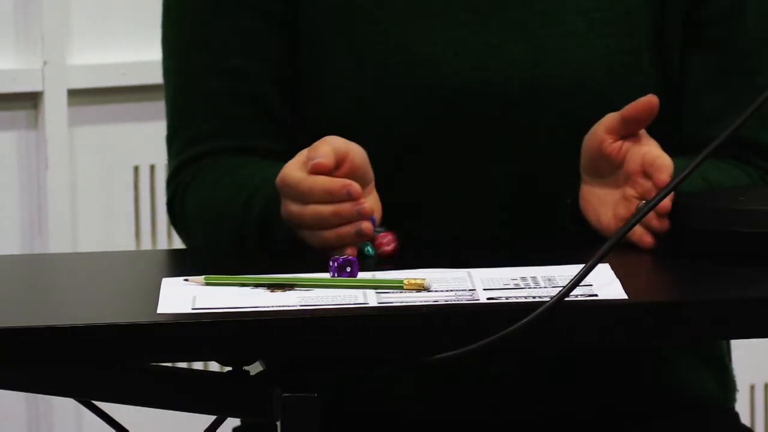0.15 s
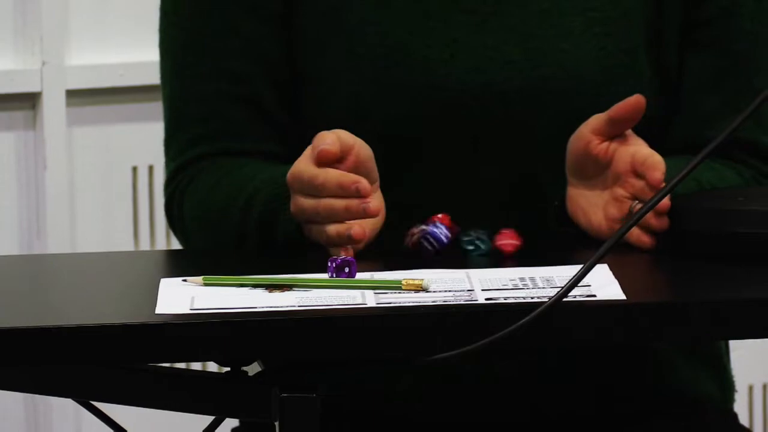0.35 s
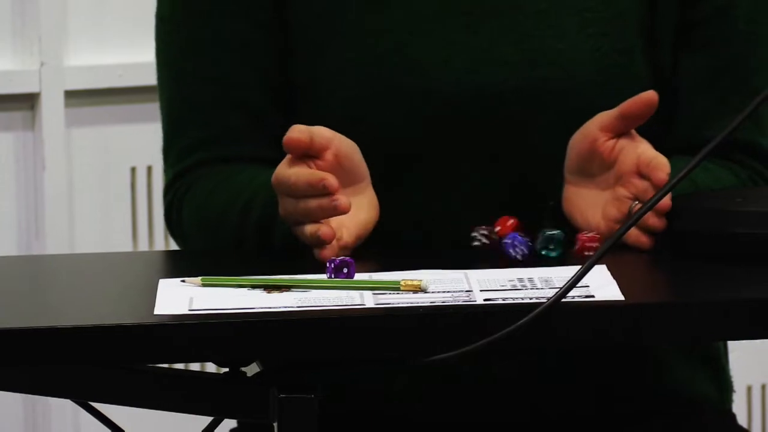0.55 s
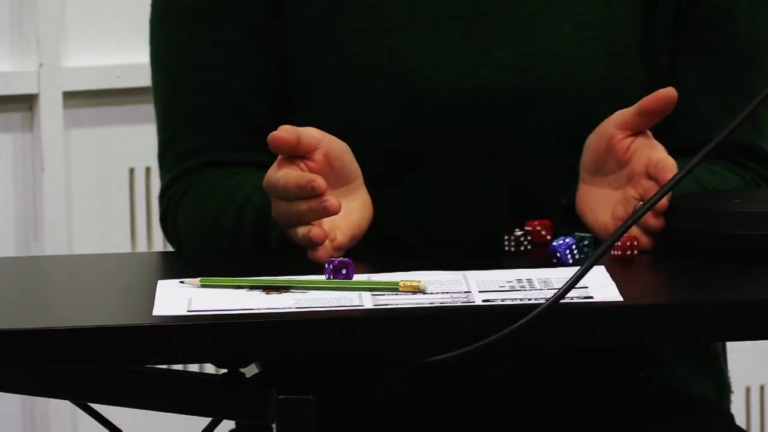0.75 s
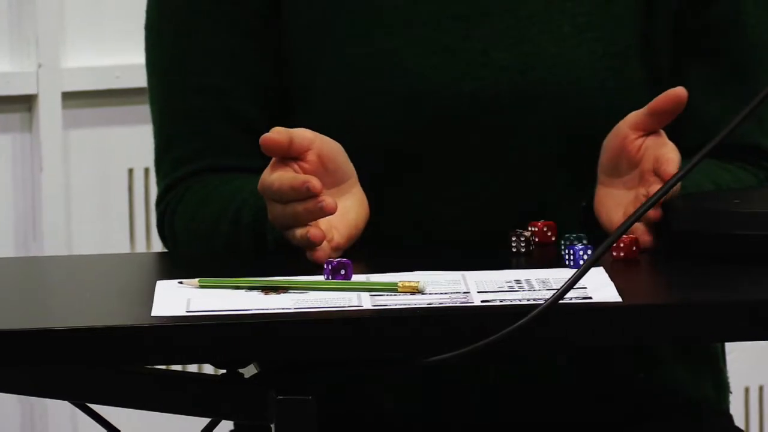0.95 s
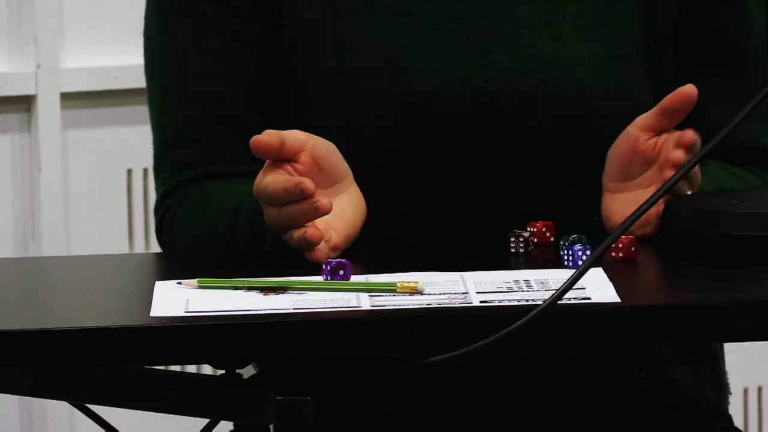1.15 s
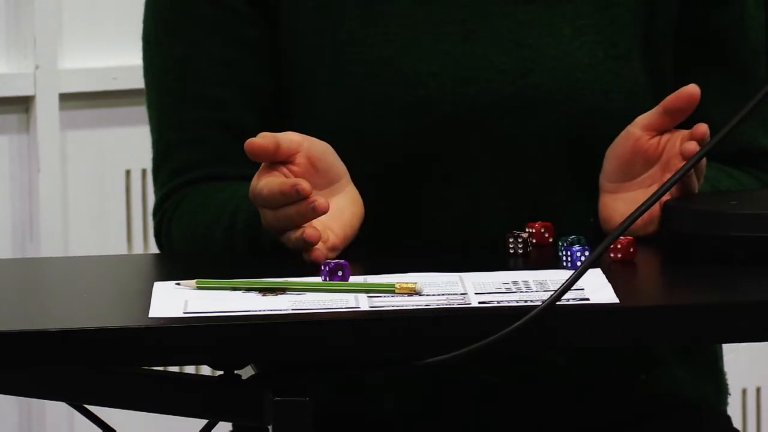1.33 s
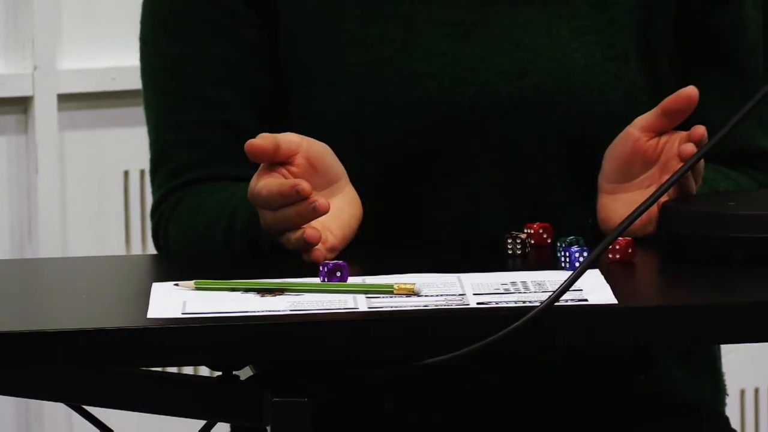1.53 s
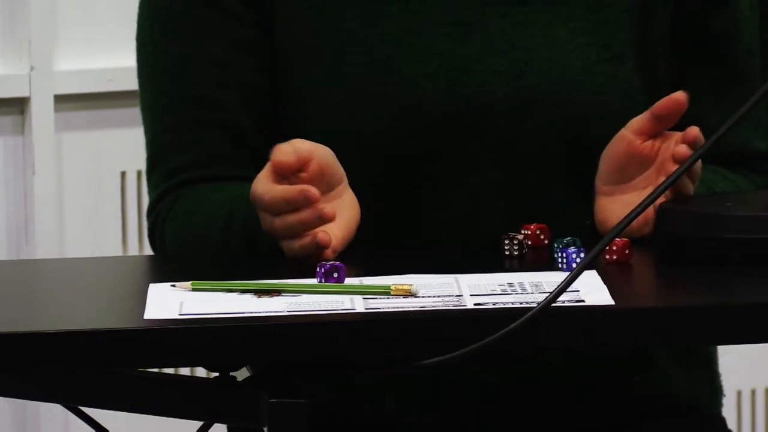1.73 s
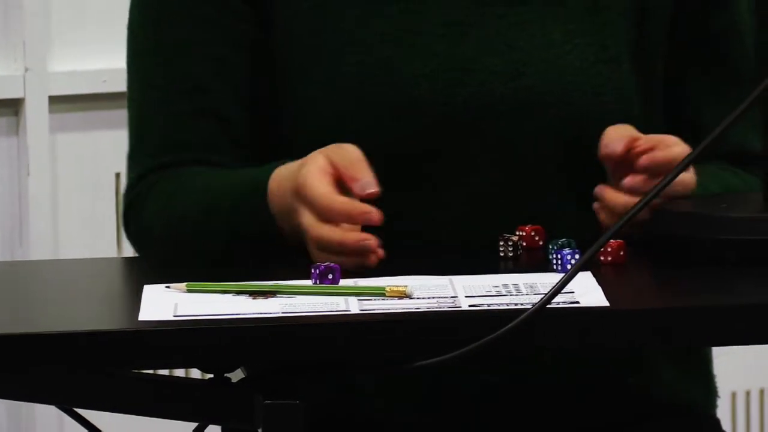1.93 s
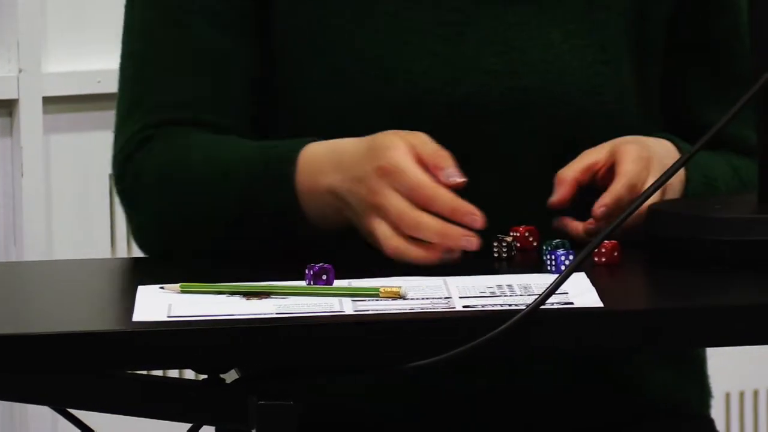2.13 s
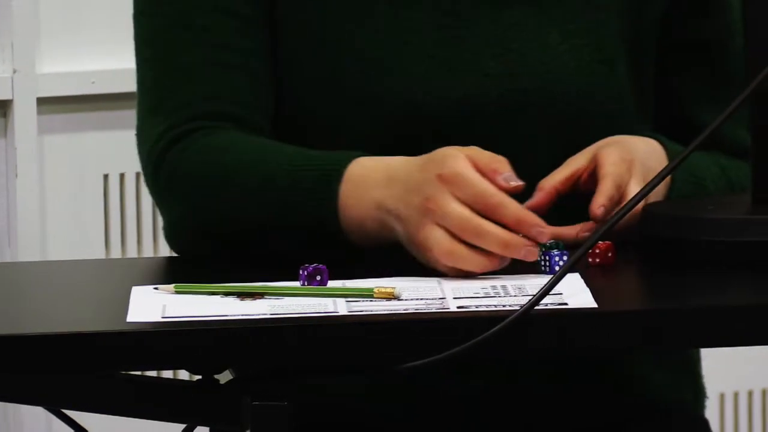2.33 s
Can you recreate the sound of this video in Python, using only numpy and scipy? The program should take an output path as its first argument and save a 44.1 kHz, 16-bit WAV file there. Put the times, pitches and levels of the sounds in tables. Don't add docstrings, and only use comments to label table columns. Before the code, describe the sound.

Dice clatter on a hollow-sounding tabletop, loud at first, then lighter rolling ticks and tiny rattles until still; later a dull wrist bump and barely audible sleeve rustle, in a quiet, slightly echoing room with faint hum.

```python
import sys
import numpy as np
from scipy import signal
from scipy.fft import rfft, irfft
from scipy.io import wavfile
from scipy.ndimage import uniform_filter1d

SR = 44100
rng = np.random.default_rng(int(sys.argv[2]) if len(sys.argv) > 2 else 0)


def dump(signal):
    limited = np.clip(np.atleast_2d(signal).T, -1, 1)
    pcm = np.round(limited * 32767).astype(np.int16)
    wavfile.write(sys.argv[1], SR, pcm)


def boost_factor(decibels):
    exponent = np.asarray(decibels, float) / 20
    return 10 ** exponent


N = 104913


def read_curve(points, hz):
    f, value = np.transpose(points)
    return np.interp(np.log(hz + 1), np.log(f + 1), value)


def evened(x):
    return x / np.sqrt(np.mean(x ** 2) + 1e-20)


def add(mix, s, sound):
    part = mix[round(s * SR):][:len(sound)]
    part += sound[:len(part)]


def resonate(x, hz, width):
    turn = np.exp(2j * np.pi * np.cumsum(hz * np.ones(len(x))) / SR)
    r = np.exp(-np.pi * width / SR)
    smooth = signal.lfilter([1 - r], [1, -r], x / turn + 1e-18)
    return 2 * (turn * smooth).real


def resonate_twice(x, hz, width):
    return evened(resonate(resonate(x, hz, width), hz, width))


def coloured(x, points):
    hz = np.fft.rfftfreq(len(x), 1 / SR)
    return irfft(rfft(x) * boost_factor(read_curve(points, hz)), len(x))


def highpass(x, hz):
    return signal.sosfilt(signal.butter(2, hz, "high", fs=SR, output="sos"), x)


# (frequency [Hz], level [dB per Hz])
HISS = [(20, 0.5), (55, -16), (100, 0), (150, -12), (300, -13.5), (700, -20.5), (2000, -21.5), (16000, -24)]
# (frequency [Hz], level [dB rms], steadiness [ratio])
FAN_HUM = [(94, -68, 0), (144, -67, 0), (739, -79, 2), (1035, -79, 2), (1338, -85, 1)]


def room_tone():
    t = np.arange(N) / SR
    tone = boost_factor(-59) * evened(coloured(rng.standard_normal(N), HISS))
    for hz, db, steadiness in FAN_HUM:
        wavering = evened(resonate(rng.standard_normal(N), hz, 4))
        steady = 2 * steadiness * np.sin(2 * np.pi * hz * t)
        tone += boost_factor(db) * evened(wavering + steady)
    return tone


def push(contact_s):
    shape = np.hanning(int(contact_s * SR) + 3)
    return shape / shape.sum()


# (time [s], level [dB], contact [s])
HAND_BUMPS = [
    (.057, -44, 0.0018),
    (1.748, -40.5, 0.0055),
    (1.788, -49, 0.0027),
    (1.9038, -27, 0.0057),
    (1.907, -40, 0.0023),
    (1.935, -47.5, 0.0033),
]
# (frequency [Hz], level [dB], time to fall 60 dB [s])
TABLE_MODES = [(106.6, -9.5, .16), (109.5, -7.5, 0.19), (143, -12.5, .06), (222.1, -4, 0.23),
               (328, -18.5, .13), (444.6, -13, 0.11), (560, -13, 0.11), (1160, -16.5, .06),
               (1560, -17.5, .05)]
MODE_SIGNS = [-1, -1, -1, 1, -1, 1, -1, 1, -1]
# (time [s], level [dB re tick])
DICE_WEIGHT = [(.081, 2.5), (.095, -7.5), (.13, 0.5), (.165, -6.5), (.186, 2.5), (.2, 0), (.25, -4.5),
               (.3, -3), (.35, -7.5), (.39, 0), (.45, -7.5), (.52, -1), (.6, -3), (.7, -2), (.85, -4),
               (1.1, -2)]


def table_top():
    delay_s, contact_s = .002, .0006
    wood_share, spot_spread = .2, .3
    t = np.arange(SR // 2) / SR
    out = np.zeros(N)
    for (hz, mode_db, t60), sign in zip(TABLE_MODES, MODE_SIGNS):
        force = np.zeros(N)
        for s, db, _, _, wood_db in STRIKES:
            weight_db = np.interp(s, *np.transpose(DICE_WEIGHT))
            blow = boost_factor(db + wood_share * wood_db + weight_db)
            spot = 1 + spot_spread * np.log(hz / 90) * rng.standard_normal()
            add(force, s + delay_s, blow * spot * push(contact_s))
        for s, db, bump_s in HAND_BUMPS:
            add(force, s, boost_factor(db) * push(bump_s))
        ring = sign * boost_factor(mode_db - 60 * t / t60) * np.sin(2 * np.pi * hz * t)
        out += signal.oaconvolve(force, ring)[:N]
    return highpass(out, 78)


# (frequency [Hz], time to fall 60 dB [s])
ROOM_DECAY = [(200, 0.78), (1000, 0.64), (2000, 0.27), (4000, 0.35), (7000, 0.28), (12000, 0.84)]


def room(x):
    start_s, tilt_db = 0.0067, -5
    taps = np.zeros(SR)
    at = np.arange(0, SR - 20, 20) + rng.integers(0, 20, (SR - 1) // 20)
    taps[at] = rng.choice([-1., 1.], at.shape)
    taps[:round(start_s * SR)] = 0
    hz, t, z = signal.stft(taps, SR, nperseg=128)
    decay_db = -60 * t / read_curve(ROOM_DECAY, hz)[:, None]
    treble_db = tilt_db * np.log2(np.maximum(hz, 2000) / 2000)[:, None]
    tail = signal.istft(z * boost_factor(decay_db + treble_db), SR, nperseg=128)[1]
    return signal.fftconvolve(x, tail / np.linalg.norm(tail))[:N]


ROCK_HASTE = 1.5


def tick(db, bright_db, top_db, wood_db, haste):
    paths_per_s = 11000
    bright_s, dull_s, sink_s, knock_s = 0.0037, 0.0057, 0.0043, 0.0027
    t = np.arange(700) / SR * haste
    noise = rng.standard_normal(700)
    paths = np.tanh(noise) * (rng.random(700) < paths_per_s / SR) + (t == 0)
    early = paths * np.exp(-(t / bright_s) ** 2)
    late = paths * np.exp(-(t / dull_s) ** 2)

    bright_hz = 5546 * (1 + .05 * np.tanh(noise[-1]))
    bright = resonate_twice(early, bright_hz, 2260)
    edge = evened(np.diff(early, prepend=0))
    top = resonate_twice(early, 7474, 2900) + boost_factor(-9) * edge
    dull_hz = 2850 + (3800 - 2850) * np.exp(-t / sink_s)
    dull = resonate_twice(late, dull_hz, 1900)
    knock = resonate_twice(paths * t * np.exp(-t / knock_s), 1772, 2460)

    rings = boost_factor(bright_db + 0.5) * bright + boost_factor(top_db + 6) * top
    return boost_factor(db - 9.5) * (rings + dull + boost_factor(wood_db + 1) * knock)


# (time [s], level [dB])
RATTLE_LEVEL = [
    (.08, -38),
    (.3, -38),
    (.6, -38),
    (.8, -40),
    (0.9, -44),
    (1.02, -46),
    (1.06, -43),
    (1.11, -47),
    (1.14, -90),
]


def rattle():
    contacts_per_s, spread_db = 370, 3
    level_db = np.interp(np.arange(N) / SR, *np.transpose(RATTLE_LEVEL), left=-200, right=-200)
    louder_db = spread_db * np.minimum(rng.exponential(1, N), 2)
    size = boost_factor(level_db + louder_db) * (rng.random(N) < contacts_per_s / SR)
    kind = rng.integers(0, 8, N)
    out = np.zeros(N)
    for k in range(8):
        contact = tick(-8.5, 3.1 * (k - 6), 1.2 * k - 19, -1.5, ROCK_HASTE)
        out += signal.oaconvolve(size * (kind == k), contact)[:N]
    return out


# (time [s], level [dB], bright ring [dB re tick], top [dB re tick], wood knock [dB re tick])
LANDING_STRIKES = [(0.0813, -14.5, -1, -8.5, -25.5), (0.0942, -24, -7, 1, -6), (0.099, -22.5, -9, -15, -18),
                   (0.1146, -26.5, -15, -7, 0), (0.1203, -21, -19, -10, -13), (0.1298, -24.5, 3, -7, -5),
                   (0.1322, -22, -5.5, -18, -10.5), (0.146, -20, -16, -18, -4.5), (0.1657, -17, 3, 0, -2.5),
                   (0.1775, -30.5, 8, -4, -12), (0.1846, -31, 0, -28, 0.5), (0.1937, -15, -5, 2, -14),
                   (0.2068, -20, 1, -15.5, 4.5), (0.213, -39, 3, -17, -5.5), (0.2295, -22.5, -13, -25, -1),
                   (0.2465, -22, 2.5, -14, -6), (0.2565, -16.5, -6, -17, -5.5), (0.277, -16, -2, -8.5, -4),
                   (0.292, -25.5, 0, -3, -5.5), (0.3072, -30, 2, -23, 9.5), (0.3113, -31, -9, -25, -8.5),
                   (0.3278, -21.5, 0, -10, 0), (0.3384, -22.5, 2.5, -18, 1.5), (0.3425, -21.5, 1, -38, 0.5),
                   (0.37, -25, 1, -25, 3.5), (0.379, -26, -13, -24, 0), (0.3878, -26, 3, -18, -4.5),
                   (0.3985, -30, 3, -24, 5), (0.4068, -29.5, -6, -26, 4.5), (0.4172, -21, -4, -17, -3),
                   (0.4365, -24.5, -0.5, -17, -3), (0.4415, -33.5, -9, -18.5, -1)]
# (time [s], level [dB], bright ring [dB re tick], top [dB re tick], wood knock [dB re tick])
ROLLING_STRIKES = [(0.451, -22.5, 1.5, -1, -6.5), (0.4542, -27, -5, -16, -4), (0.4662, -28.5, -17, -7, 1),
                   (0.4731, -30.5, 3, -9.5, 5.5), (0.4823, -27.5, -3, -9, 3.5),
                   (0.4965, -24.5, -2.5, -10, -2.5), (0.5017, -31.5, 3, -4, 3.5),
                   (0.5077, -26, -7.5, -20, -12), (0.533, -30, -8.5, -13, 3.5), (0.539, -28, 0, -12, 0),
                   (0.5446, -29, 7, -0.5, 5), (0.5543, -32, 0, -6, 5), (0.559, -26.5, -6, -4, -1),
                   (0.5815, -25, 2, -0.5, -12), (0.587, -29.5, 9.5, -4, 2), (0.593, -30.5, -9, 0.5, -3),
                   (0.602, -36, -11, -3, 6), (0.614, -31.5, -11, -10, -9), (0.628, -29.5, 0, -5, -9),
                   (0.635, -32.5, 1, -3, 3), (0.6441, -24.5, 2.5, 1, -10), (0.65, -29, -17, -15, -9),
                   (0.657, -34, -11, -4, -7), (0.6634, -31, -12, -10, -1.5), (0.6729, -37, 7, -7.5, -2),
                   (0.6817, -32.5, -1, -13, -4), (0.6876, -24.5, -2, -3, -4.5), (0.6987, -39, -8, -10, 3),
                   (0.706, -31.5, -2, -10, -5), (0.7208, -28.5, 2, 0.5, -15), (0.7252, -27.5, -13, -17, -8),
                   (0.7365, -33.5, 4, 0, -3.5), (0.7474, -32, 1.5, -6, -9), (0.754, -30, -4, -22, 0),
                   (0.766, -32.5, 0, -11, -2), (0.78, -32.5, -8, -10.5, 1.5)]
# (time [s], level [dB], bright ring [dB re tick], top [dB re tick], wood knock [dB re tick])
ROCKING_STRIKES = [(0.7948, -39, -12, -20, -1), (0.804, -39, -5, -21, -12), (0.812, -37, -12, -21, -1),
                   (0.824, -38, -0.5, -24, -3), (0.8304, -42, -7, -17, -2), (0.8425, -35, -6, -21, -6),
                   (0.8587, -38, -7, -12, -2.5), (0.8745, -41.5, 0, -3, 0.5), (0.905, -47.5, -8, -6, -2),
                   (0.909, -45.5, 3, -16, -2), (0.9123, -45, -8, -13, -14), (0.934, -42, -17, -7, -2.5),
                   (0.9396, -44, -5, -19, -1), (0.96, -43.5, -14, -18, -8), (0.9676, -43.5, -12, -16.5, -4),
                   (0.972, -49.5, -30, -26, 6), (0.979, -46.5, -15, -20, -2), (0.989, -43, -10, -19, -6),
                   (0.995, -44.5, -2, -21, -6), (1.0007, -46, -3, -18, 0), (1.0091, -53, -10, -25, -1),
                   (1.0346, -44, 0.5, -15, 0.5), (1.0409, -41.5, -6, -4, -10), (1.048, -43.5, 12, -3, -8.5),
                   (1.0547, -45, 6, 4.5, -9), (1.0655, -46, -5, -11, -8), (1.072, -42.5, -2, -13, -1.5),
                   (1.085, -44.5, 3, -5, -3), (1.0969, -40.5, -8, -11, -13), (1.103, -48.5, -6.5, -16, -2)]
STRIKES = LANDING_STRIKES + ROLLING_STRIKES + ROCKING_STRIKES
# (frequency [Hz], level [dB])
ROCKING_COLOUR = [(1000, -2.5), (2500, 4), (3800, -5), (5500, -0.5), (7000, -5), (7900, -1), (8800, -7.5),
                  (12000, -8)]
# (frequency [Hz], level [dB])
AIR_COLOUR = [(300, -35.5), (900, 1.5), (2000, 4), (3500, 6), (6000, 5.5), (8500, -6), (11000, -6),
              (16000, -26)]


def dice():
    rocking_from_s = .79
    air = rattle()
    for s, *levels in STRIKES:
        add(air, s, tick(*levels, ROCK_HASTE if s > rocking_from_s else 1))
    rocking_part = np.clip((np.arange(N) / SR - rocking_from_s) / .02, 0, 1)
    heard = air * (1 - rocking_part) + coloured(air * rocking_part, ROCKING_COLOUR)
    return coloured(heard, AIR_COLOUR)


# (time [s], level [dB])
LEG_SWAYS = [(.1, -46), (.2, -43), (.36, -45), (.5, -46), (.6, -40), (.72, -49), (0.946, -43),
             (1.011, -43.5), (1.199, -69), (1.799, -57), (1.921, -52), (2.17, -65.5)]


def table_sway():
    sway_hz, rise_s = 34, 0.013
    t = np.arange(SR // 2) / SR
    swell = t / rise_s * np.exp(1 - t / rise_s)
    thud = swell * np.sin(2 * np.pi * sway_hz * t)
    out = np.zeros(N)
    for s, db in LEG_SWAYS:
        add(out, s, boost_factor(db) * thud)
    return out


# (time [s], length [s], level [dB])
SLEEVE_BRUSHES = [
    (1.8, .2, -69),
    (2.2, .17, -70),
]


def sleeve():
    cloth = resonate_twice(rng.standard_normal(SR // 2), 5700, 2000)
    out = np.zeros(N)
    for s, length, db in SLEEVE_BRUSHES:
        swell = np.hanning(round(length * SR))
        add(out, s, boost_factor(db) * swell * cloth[:len(swell)])
    return out


def scene():
    wood = table_top() + table_sway()
    air = dice()
    echoes = room(boost_factor(-8.5) * air + boost_factor(-20) * wood)
    mono = room_tone() + wood + air + echoes + sleeve()
    return np.array([mono, mono])


def band_limit(x):
    return signal.sosfilt(signal.butter(12, 16830, fs=SR, output="sos"), x)


def record(dry):
    limit = .42
    held = dry / (1 + abs(dry / limit) ** 4) ** .25
    overloaded = uniform_filter1d(1. * (abs(dry[0]) > limit), 200) > 1e-6
    top = highpass(np.roll(held[0], 30), 10000)
    held = held + boost_factor(-11) * overloaded * top * np.array([[1], [-1]])
    mix = signal.oaconvolve(held, signal.firwin(301, 16150, fs=SR)[None], "same")
    return band_limit(mix)


dry = scene()
out = record(dry)
dump(out)
```